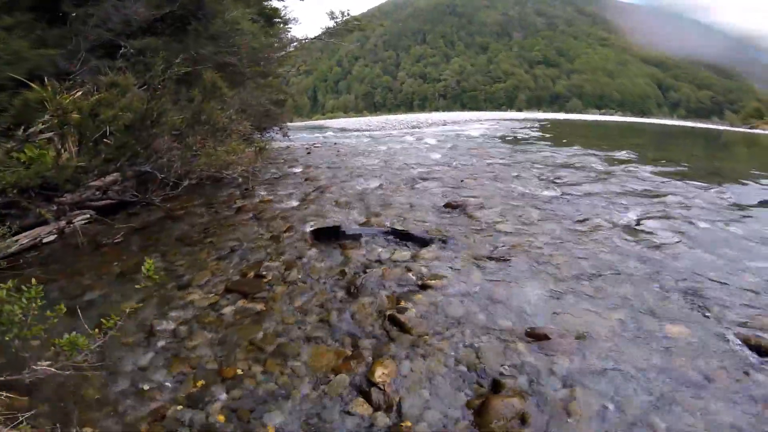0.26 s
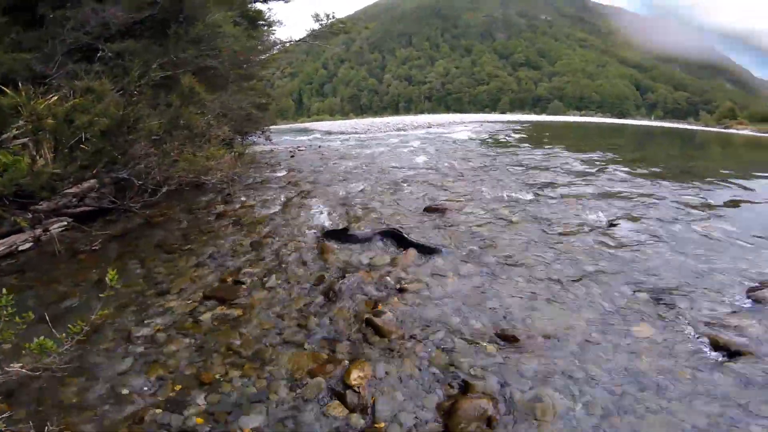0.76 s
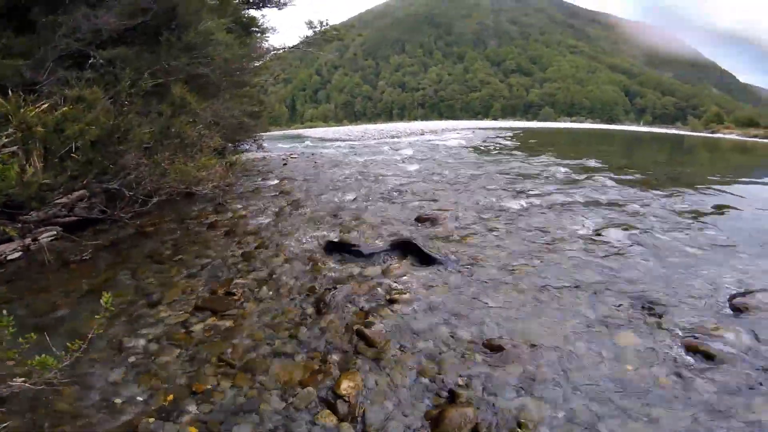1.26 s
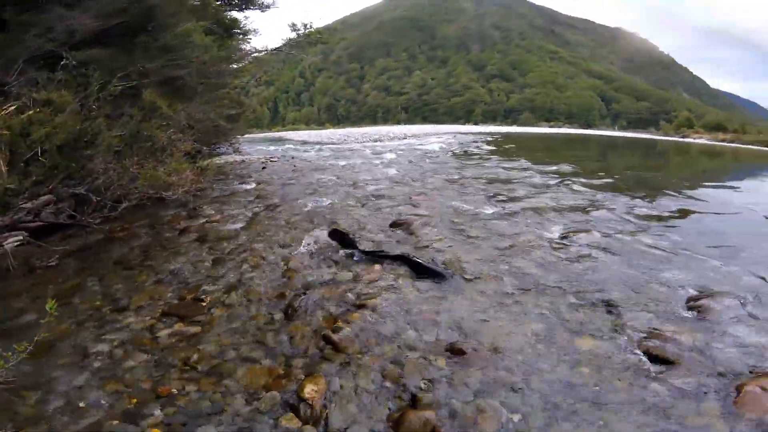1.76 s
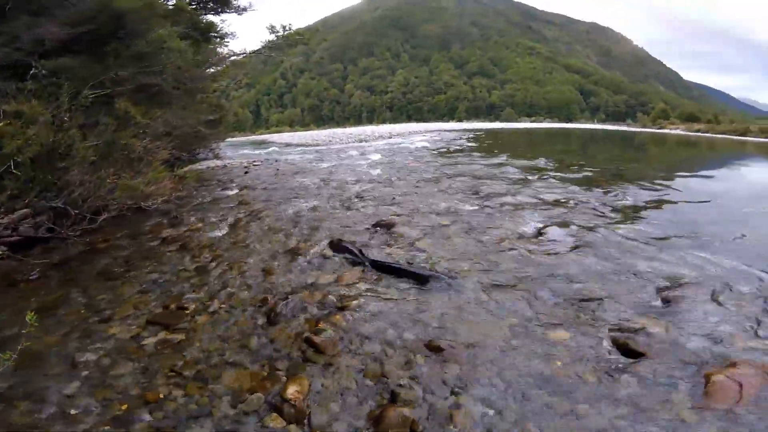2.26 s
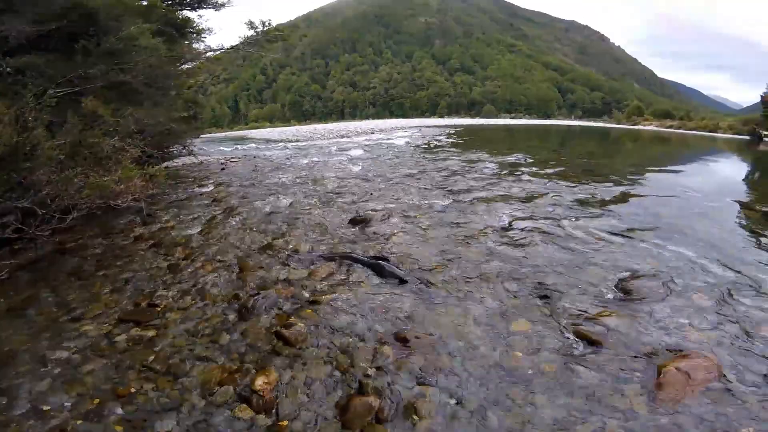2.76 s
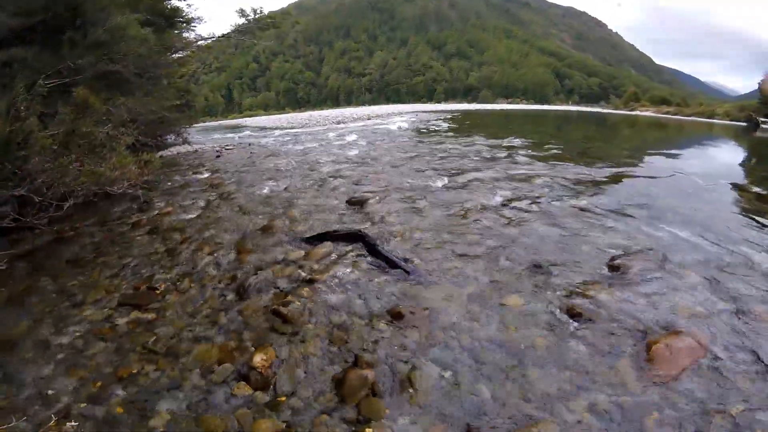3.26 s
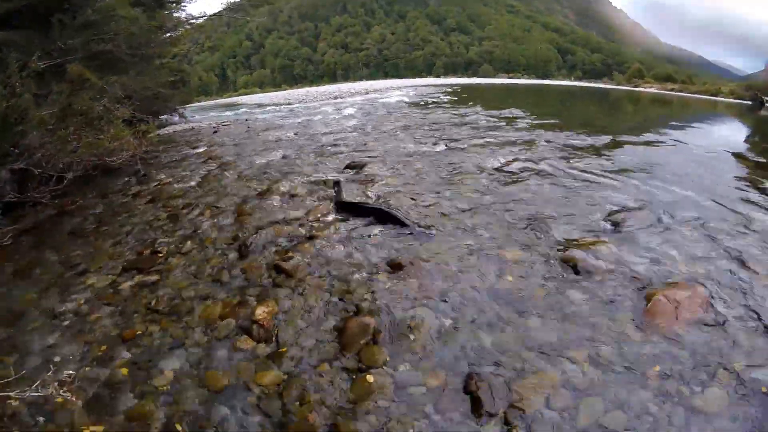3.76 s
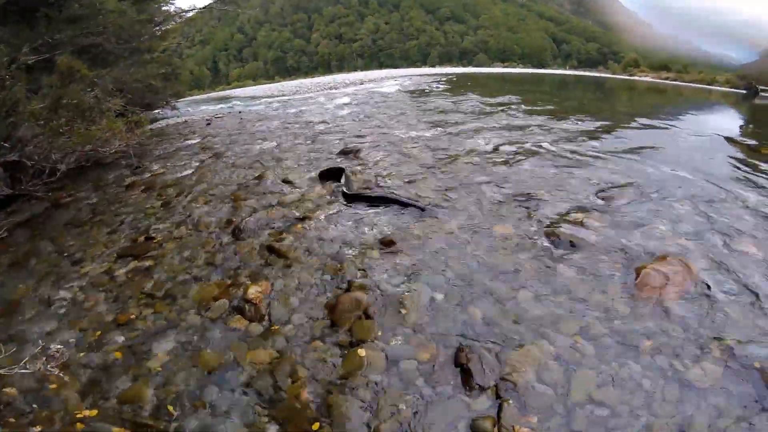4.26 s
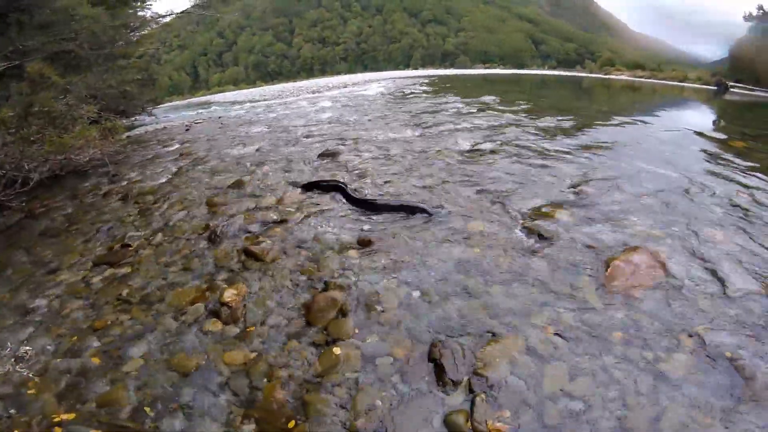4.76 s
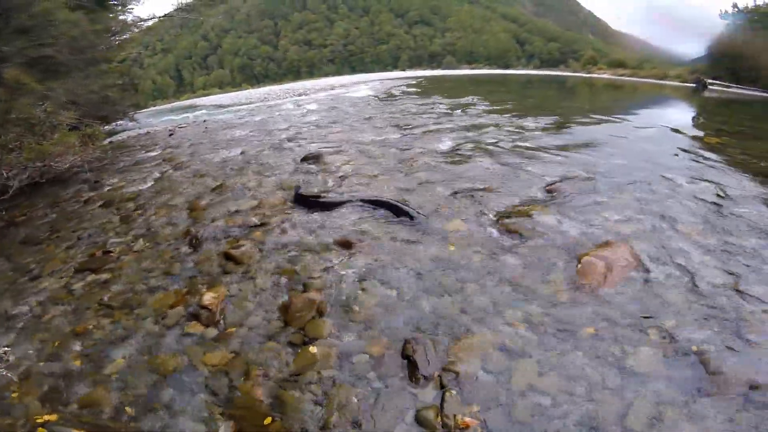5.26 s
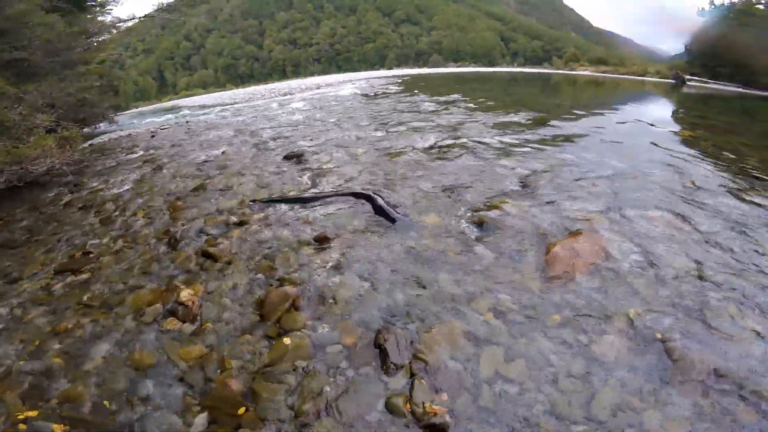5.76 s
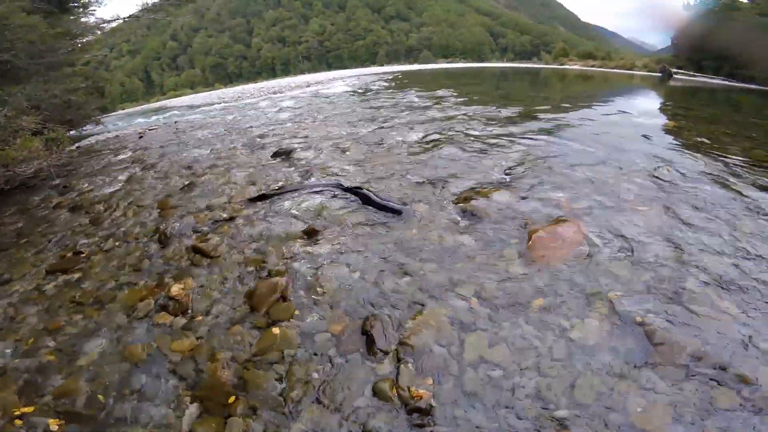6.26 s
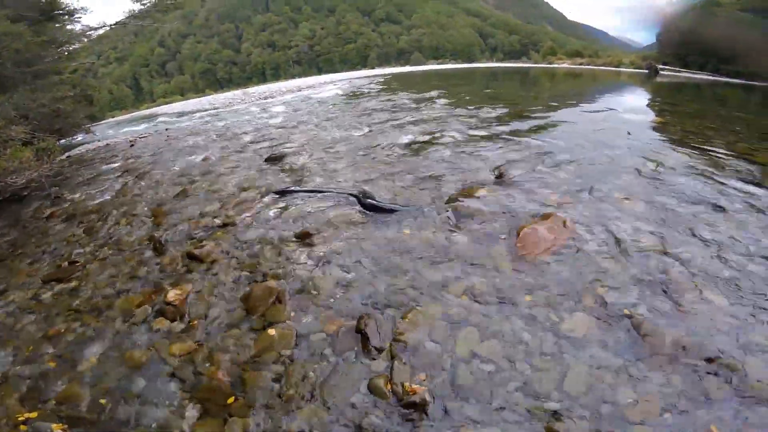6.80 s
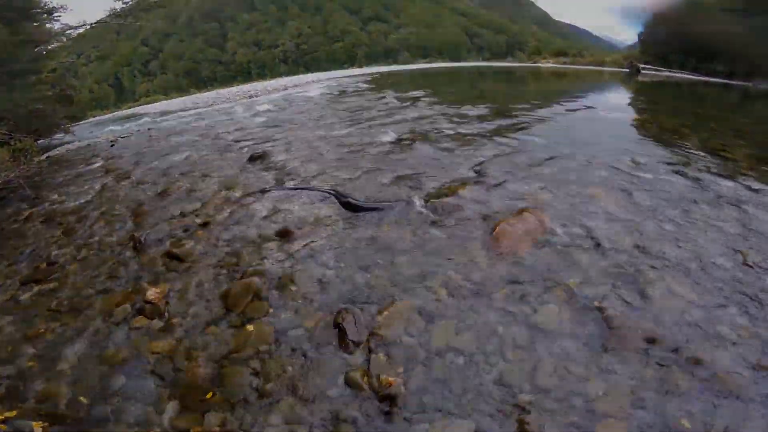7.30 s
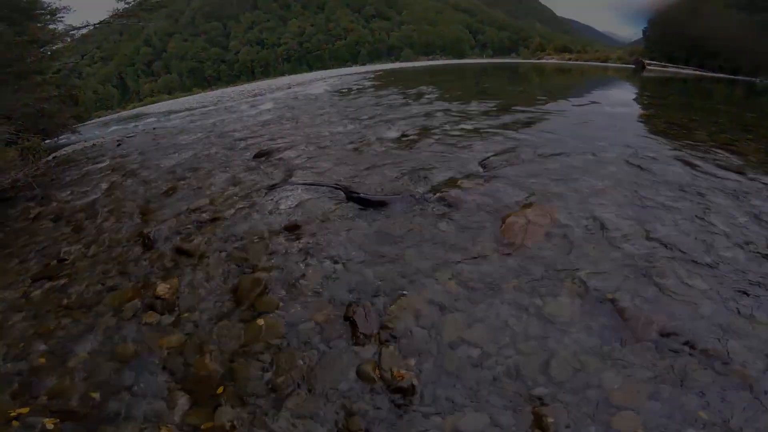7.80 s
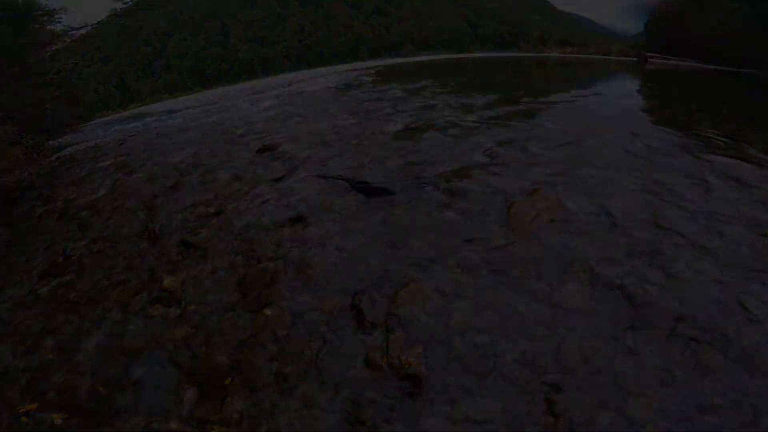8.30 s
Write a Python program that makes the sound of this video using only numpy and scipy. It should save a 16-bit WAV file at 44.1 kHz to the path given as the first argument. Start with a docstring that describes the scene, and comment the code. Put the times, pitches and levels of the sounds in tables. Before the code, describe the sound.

Close, slightly muffled water gurgles steadily over stones with little plops, while the microphone bumps and rubs softly in the hand.

```python
"""A shallow stream over stones

Heard close up from a hand-held camera in a waterproof case: a wide rush, swarms of ringing bubbles,
drops and splashes. The case wall colours the rush and the swarms, and resonates near 1.8 kHz.
The hand bumps and rubs the grip, exciting its low modes; the case gives one sharp knock.
The sound fades at the end."""
import sys
import numpy as np
from scipy import signal
from scipy.fft import rfft, irfft, next_fast_len
from scipy.io import wavfile

SR = 44100
rng = np.random.default_rng(int(sys.argv[2]) if len(sys.argv) > 2 else 0)


def transcribe(u):
    """Save the signal u as a 16-bit wav file named by the first command-line argument.

    u: samples, shape (n,) or (channels, n), limited to [-1, 1]; the rate is SR.
    q: integer samples, one column per channel.
    """
    v = np.clip(np.atleast_2d(u).T, -1, 1)
    q = np.round(v * 32767).astype(np.int16)
    wavfile.write(sys.argv[1], SR, q)


N = 376613

# Transmission through the case wall. Each row: frequency in Hz, relative gain in dB.
WALL_TRANSMISSION = [(100, -8), (240, -2), (360, 0.5), (1050, 0.5), (1400, 1.5), (1780, 6.5), (2100, -1.5),
                     (2400, -8), (2900, -12.5), (3400, -13), (3700, -25.5), (4000, -49.5), (4600, -55)]


def stream():
    """Transmission through a wall: the case filters a broadband rush and a gurgle of low bubbles."""
    rush_db, gurgle_db = -37, -46
    rush = rms_one(colour(rng.standard_normal(N), WALL_TRANSMISSION))
    low_bubbles = swarm(per_s=600, low_hz=318, high_hz=1510, cycles=23.5, spread_db=3, rise=0.094)
    gurgle = rms_one(colour(low_bubbles, WALL_TRANSMISSION))
    return from_db(rush_db) * rush + from_db(gurgle_db) * gurgle


def babble():
    """Forced resonance: bubbles at the nearest stones sound through the wall and drive its main mode."""
    # Wavelets that swell the babble. Each row: crest time in seconds, length in seconds, boost in dB.
    surges = [(0.14, 0.49, 4), (0.74, 0.3, 1.5), (1.922, 0.82, 1.5), (3.9, 0.39, 3), (6.074, 0.32, 2)]
    start_db, fall_db_per_s = -40.5, 0.48   # the level falls as the camera turns away
    bubbles = swarm(per_s=550, low_hz=1428, high_hz=3570, cycles=22.3, spread_db=3, rise=0.1)
    transmitted = from_db(-7.5) * rms_one(colour(bubbles, WALL_TRANSMISSION))
    wall_mode = from_db(-8) * rms_one(ring(bubbles, hz=1776, t60=0.011))
    voice = rms_one(band(transmitted + wall_mode, 624, 3800, order=6))
    t = np.arange(N) / SR
    surge_db = sum(db * np.cos(np.pi * np.clip((t - s) / length, -.5, .5)) ** 2
                   for s, length, db in surges)
    return from_db(start_db - fall_db_per_s * t + surge_db) * voice


def swarm(per_s, low_hz, high_hz, cycles, spread_db, rise, count=40):
    """A Poisson process of varying rate: bubbles are born in clumps as wavelets break on the stones."""
    births = np.flatnonzero(rng.random(N) < per_s * from_db(3 * drift(14)) / SR)
    gains = from_db(spread_db * np.minimum(rng.exponential(1, N), np.log(30)))[births]
    kinds = rng.integers(0, count, N)[births]
    pitches = np.geomspace(low_hz, high_hz, count)
    notes = [hz ** 1.1 * bubble(hz, cycles, rise) for hz in pitches]   # small ones are brief but sharp
    out = np.zeros(N)
    for at, gain, kind in zip(births, gains, kinds):
        add(out, at / SR, gain * notes[kind])
    return rms_one(out)


def bubble(hz, cycles, rise):
    """A damped oscillator: a bubble dies by 60 dB, its pitch up by the share `rise` as it surfaces."""
    age = np.arange(0, 1, hz / (cycles * SR))
    phase = 2 * np.pi * cycles * age * (1 + rise * age / 2)
    return np.sin(phase) * np.exp(-np.log(1000) * age)


def drops():
    """Transient oscillation: each drop striking the water gives a tone that quickly swells and dies."""
    # Each row: start in seconds, peak level before filtering in dB, pitch in Hz, swell time in seconds.
    impacts = [(0.2112, -29, 2800, 0.00063), (0.3172, -23.5, 2000, 0.00078), (0.4323, -22.5, 1860, 0.0013),
               (0.657, -22, 1860, 0.00077), (1.722, -23, 1750, .0006), (1.8034, -25, 1900, 0.00081),
               (1.892, -25, 1720, 0.0012), (1.948, -22, 1890, 0.00073), (1.9742, -21, 1940, 0.00081),
               (2.061, -25.5, 2180, .0009), (2.1155, -21, 1500, 0.00064), (2.936, -33, 2950, .0008),
               (3.0458, -26, 1790, .0007), (3.2641, -27, 1800, .0007), (3.3773, -22.5, 1700, .0009),
               (3.739, -36, 2330, 0.00073), (3.814, -27, 1560, 0.00092), (3.877, -30, 2090, .0009),
               (3.890, -35, 2400, .001), (4.060, -32, 1190, 0.001), (4.7172, -21.5, 2100, 0.0011),
               (4.9122, -24, 1880, 0.0012), (6.0595, -22, 1630, 0.0012), (6.076, -26, 1750, 0.0011),
               (6.086, -28, 1320, 0.00087), (6.3794, -26, 1830, .0012), (6.471, -37, 2800, .0009),
               (6.5346, -25, 1920, 0.0014), (7.1558, -34, 3030, 0.00055), (7.490, -27, 2050, .0008),
               (8.077, -36, 3040, 0.00066)]
    out, t = np.zeros(N), np.arange(SR // 20) / SR
    for s, db, hz, swell_s in impacts:
        envelope = (t / swell_s * np.exp(1 - t / swell_s)) ** 2
        add(out, s, from_db(db) * envelope * np.sin(2 * np.pi * hz * t))
    return band(out, 480, 3560, order=8)


def plops():
    """Bubble resonance: single large bubbles stand out of the babble as short, rising notes."""
    # Each row: start in seconds, peak level before filtering in dB, pitch in Hz, ringing in cycles.
    large_bubbles = [(0.313, -26, 830, 12), (0.320, -31, 1960, 28), (0.579, -32, 2620, 22),
                     (0.6725, -24, 1800, 40), (0.690, -28, 1900, 34), (0.732, -27.5, 1760, 50),
                     (0.763, -25, 1750, 44), (0.769, -24, 1810, 54), (0.943, -34, 430, 20),
                     (1.183, -29, 750, 10), (1.8135, -26.5, 1370, 40), (1.997, -29.5, 724, 17),
                     (3.081, -34, 2540, 24), (4.720, -32, 2000, 39), (4.9, -29, 1850, 36),
                     (6.005, -39, 390, 24), (6.692, -28, 756, 13), (6.695, -29, 593, 18),
                     (7.411, -31, 450, 21)]
    swell_cycles = 1.14
    out = np.zeros(N)
    for s, db, hz, cycles in large_bubbles:
        note = bubble(hz, cycles, rise=0.1)
        elapsed_cycles = np.arange(len(note)) * hz / SR
        note *= 1 - np.exp(-(elapsed_cycles / swell_cycles) ** 2)
        add(out, s, from_db(db) * note / np.abs(note).max())
    return band(out, 215, 3100, order=8)


def handling():
    """Structure-borne sound: the grip carries the hand's sway, tremor and rubbing to the microphone."""
    sway = rms_one(band(rng.standard_normal(N), 23, 32.6))
    friction = rms_one(signal.fftconvolve(rng.standard_normal(N), thud(0))[:N])
    effort = rubbing()
    sway_db = -45 + drift(1.9)   # the holding hand never rests
    tremor_db = -55 + 1.9 * drift(1.8)
    sway_gain = np.hypot(from_db(sway_db), from_db(-1) * effort)   # independent motions add in power
    friction_gain = np.hypot(from_db(tremor_db), effort)
    return sway_gain * sway + friction_gain * friction


def rubbing():
    """The envelope of sliding friction: each shift of the hand takes hold, slides evenly and lets go."""
    # Each row: start in seconds, length in seconds, rms level in dB.
    rubs = [(0.46, 0.091, -47), (0.877, 0.11, -50.5), (1.245, 0.2, -45), (1.57, 0.21, -46),
            (2.066, 0.28, -41), (2.686, 0.44, -41.5), (3.273, 0.13, -47.5), (3.39, 0.1, -42),
            (3.583, 0.26, -45.5), (4.043, 0.9, -50.5), (6.2, 0.23, -50), (6.82, 0.07, -48.5),
            (7.098, 0.32, -49)]
    attack_s, release_s = 0.023, 0.027
    t = np.arange(N) / SR
    return sum(from_db(db) * np.interp(t - s, [-attack_s, 0, length, length + release_s], [0, 1, 1, 0])
               for s, length, db in rubs)


def bumps():
    """Impulse excitation: the grip thumps each time the fingers catch on it."""
    # Each row: start in seconds, peak level in dB, brightness in dB per octave.
    pushes = [(0.516, -38, 7), (0.884, -36.5, -9), (1.272, -32, 3), (1.309, -31, 0), (1.42, -39, 4),
              (1.443, -27.5, -5), (1.472, -34, -8), (1.572, -33.5, 3), (2.066, -28.5, 1), (2.091, -30.5, 1),
              (2.121, -34, -2), (2.188, -30.5, -7), (2.335, -36.5, 2), (2.682, -29, 8), (2.722, -29, 5),
              (2.802, -31, -3), (2.885, -32, -7), (2.948, -32, 8), (3.038, -29, 5), (3.395, -35, -4),
              (4.335, -36, 1), (4.628, -31, 2), (4.654, -34, -9), (6.373, -35, -2), (7.020, -36, 9),
              (7.246, -32.5, 9), (7.845, -41, -5)]
    out = np.zeros(N)
    for s, db, tilt_db in pushes:
        add(out, s, from_db(db) * thud(tilt_db))
    return out


def thud(tilt_db):
    """Modal superposition: the grip's response to a push, peak 1; firmer pushes favour higher modes."""
    # Modes of grip and camera. Each row: frequency in Hz, relative level in dB, 60 dB decay in seconds.
    modes = [(63.4, 2, 0.1), (115.4, -3, 0.073), (166, -11, 0.05)]
    lowest_hz, swell_s = modes[0][0], 0.0032   # fingers are soft, so each push builds up
    push = signal.unit_impulse(SR // 2)
    ringing = sum(from_db(db + tilt_db * np.log2(hz / lowest_hz)) * ring(push, hz, t60)
                  for hz, db, t60 in modes)
    onset = 1 - np.exp(-np.arange(len(push)) / SR / swell_s)
    out = band(ringing * onset, 34, 222)
    return out / np.abs(out).max()


def knock():
    """A heavily damped mode: one hard tap on the case dies within milliseconds."""
    # Each row: start in seconds, peak level in dB.
    taps = [(1.1833, -21.5)]
    case_mode = ring(signal.unit_impulse(N), hz=1200, t60=0.0048)
    return strike(taps, band(case_mode, 490, 1800, order=3))


def splashes():
    """Air entrainment: a wavelet breaks into a burst of tiny bubbles and a puff of fine spray."""
    # Each row: start in seconds, rms level at the crest in dB.
    bursts = [(0.08, -54), (0.478, -53), (0.605, -53), (1.915, -46)]
    envelope = strike(bursts, np.hanning(SR // 20) ** .5)
    bubbles = swarm(per_s=1900, low_hz=2100, high_hz=4200, cycles=9.2, spread_db=3.5, rise=.1)
    fizz = rms_one(band(bubbles, 1400, 3410, order=5))
    mist = rms_one(band(rng.standard_normal(N), 7500, 10000, order=3))
    return envelope * (fizz + from_db(-26) * mist)


def spray():
    """Resonant filtering: fine spray is a faint, even hiss through the upper resonances of the case."""
    # Each row: frequency in Hz, relative spectral density in dB.
    spectrum = [(3800, -26.5), (4500, -20.5), (6050, -12.5), (6480, 1), (7000, -5.5), (8500, -8.5),
                (9500, -13), (10300, -20.5), (11400, -17), (12600, -19.5), (14200, -32)]
    hiss = colour(rng.standard_normal(N), spectrum)
    return from_db(-65.5) * rms_one(band(hiss, 3000, 18000))


def from_db(db):
    """The decibel scale: a level as an amplitude ratio."""
    return 10 ** (np.asarray(db) / 20)


def rms_one(x):
    """Normalisation to unit mean power."""
    return x / np.sqrt(np.mean(x ** 2) + 1e-20)


def drift(rate):
    """Low-pass noise: a fluctuation of unit spread, changing about `rate` times a second."""
    hz = np.arange(N // 2 + 1) * SR / N
    top = np.searchsorted(hz, 400)
    spectrum = rfft(rng.standard_normal(2 * top))[:top]
    slow = irfft(spectrum / (1 + (hz[:top] / rate) ** 2))
    return np.interp(np.linspace(0, len(slow) - 1, N), np.arange(len(slow)), rms_one(slow - slow.mean()))


def colour(x, points):
    """Minimum-phase filtering with a response through the given points of frequency in Hz, gain in dB."""
    size = next_fast_len(N + SR // 2, True)
    size += size % 2
    hz, db = np.transpose(points)
    log_hz = np.log(np.arange(size // 2 + 1) * SR / size + 1)
    magnitude = from_db(np.interp(log_hz, np.log(hz), db))
    cepstrum = irfft(np.log(magnitude))
    cepstrum[1:size // 2] *= 2   # folding onto positive time makes the filter causal
    cepstrum[size // 2 + 1:] = 0
    return irfft(rfft(x, size) * np.exp(rfft(cepstrum)))[:N]


def band(x, low_hz, high_hz, order=2):
    """Butterworth band-pass filtering."""
    sections = signal.butter(order, [low_hz, high_hz], "band", fs=SR, output="sos")
    return signal.sosfilt(sections, x + 1e-18)


def ring(x, hz, t60):
    """A two-pole resonator: a unit impulse starts a unit sine that decays by 60 dB in t60 seconds."""
    r, w = from_db(-60 / (t60 * SR)), 2 * np.pi * hz / SR
    return signal.lfilter([0, np.sin(w)], [1, -2 * r * np.cos(w), r * r], x + 1e-18)


def strike(rows, response):
    """Convolution with impulses: the response sounds at each start in seconds and peak level in dB."""
    clicks = np.zeros(N)
    for s, db in rows:
        clicks[round(s * SR)] += from_db(db)
    return signal.fftconvolve(clicks, response[:SR // 2] / np.abs(response).max())[:N]


def add(out, s, sound):
    """Superposition: a short sound joins the mix at s seconds."""
    part = out[int(s * SR):][:len(sound)]
    part += sound[:len(part)]


def scene():
    """Linear superposition: water and handling sum at one microphone."""
    water = stream() + babble() + spray() + drops() + plops() + splashes()
    return (water + handling() + bumps() + knock())[None]


def record(dry):
    """Attenuation and band limiting: a linear closing fade, then a steep low-pass filter."""
    fade_start_s, fade_length_s, cutoff_hz = 6.847, 1.87, 14050
    fade = np.clip(1 - (np.arange(N) / SR - fade_start_s) / fade_length_s, 0, 1)
    low_pass = signal.ellip(10, .1, 80, cutoff_hz, fs=SR, output="sos")
    return signal.sosfilt(low_pass, dry * fade)


dry = scene()
out = record(dry)
transcribe(out)
```